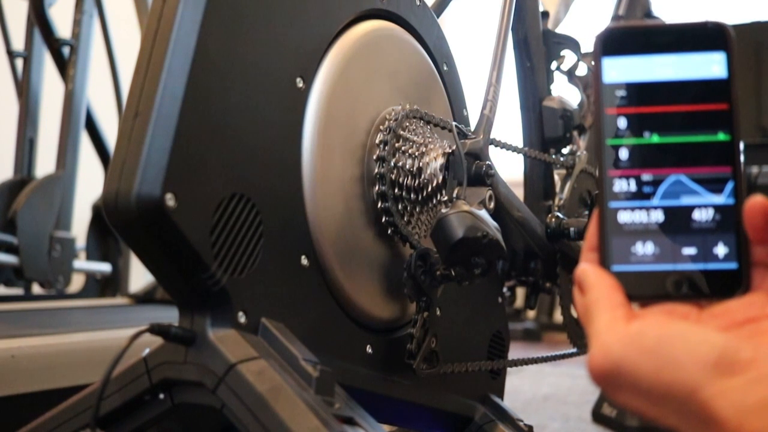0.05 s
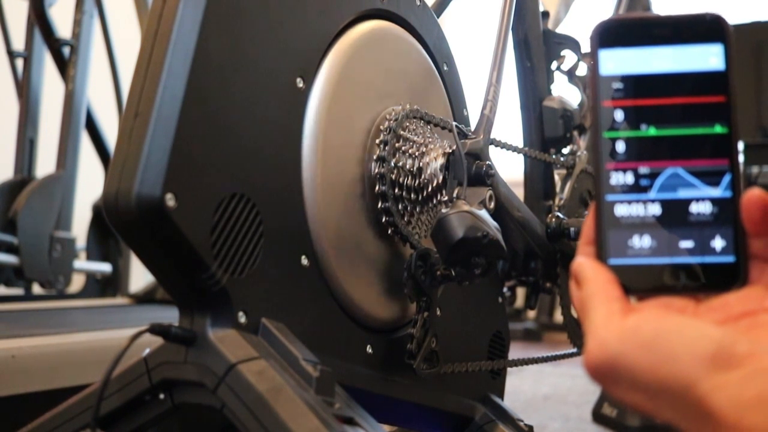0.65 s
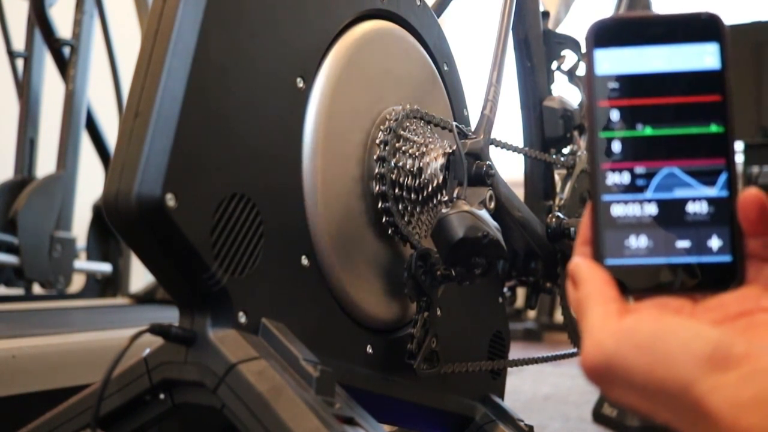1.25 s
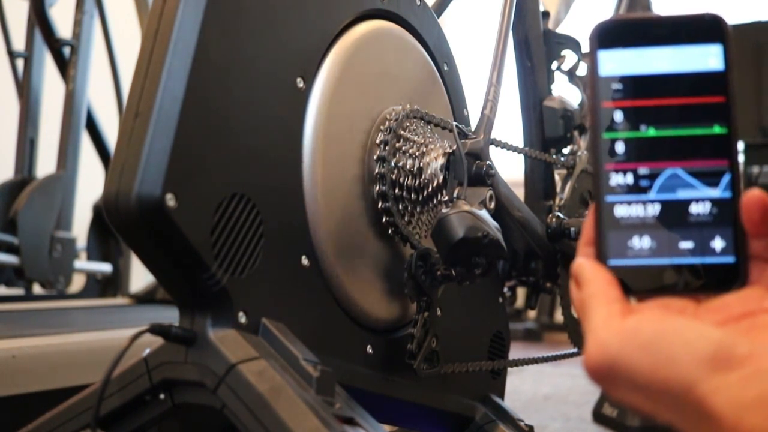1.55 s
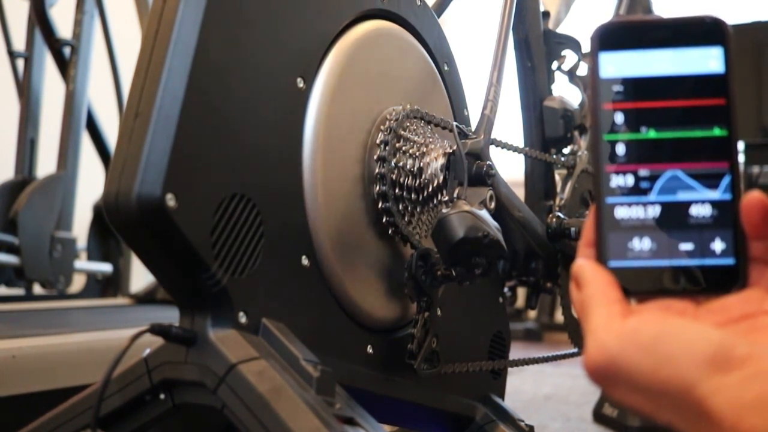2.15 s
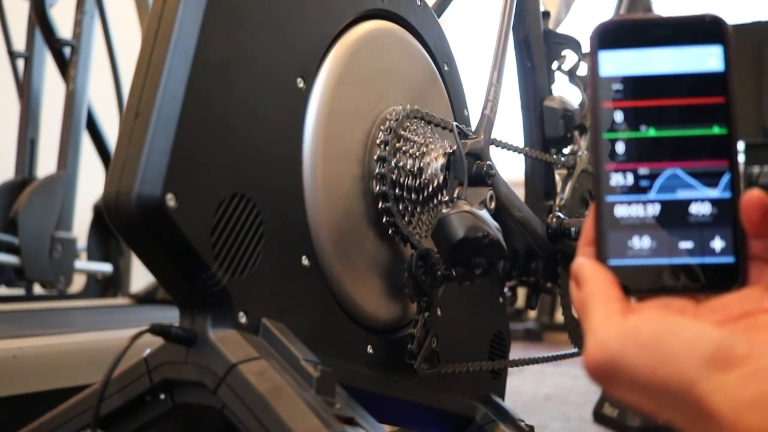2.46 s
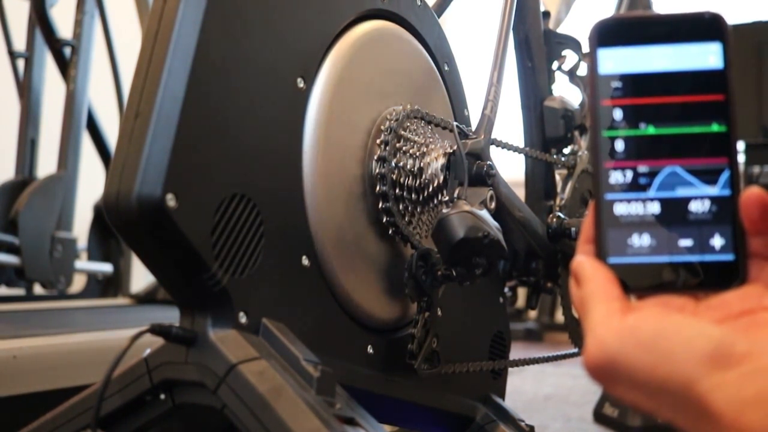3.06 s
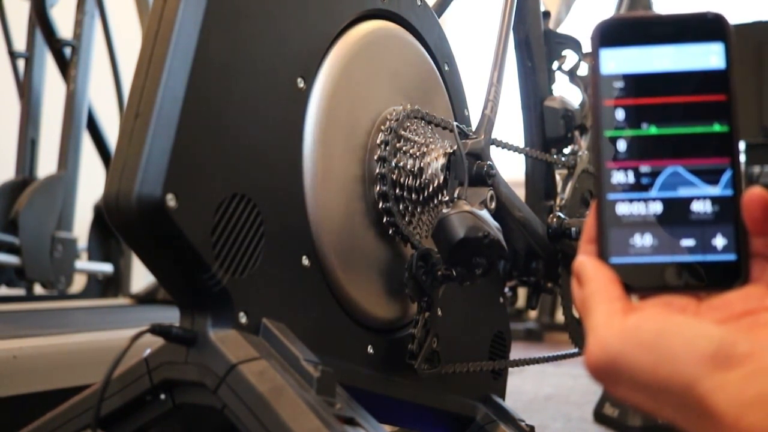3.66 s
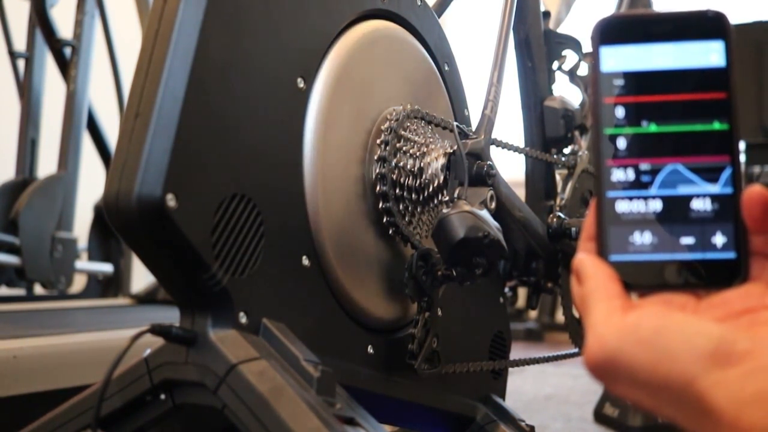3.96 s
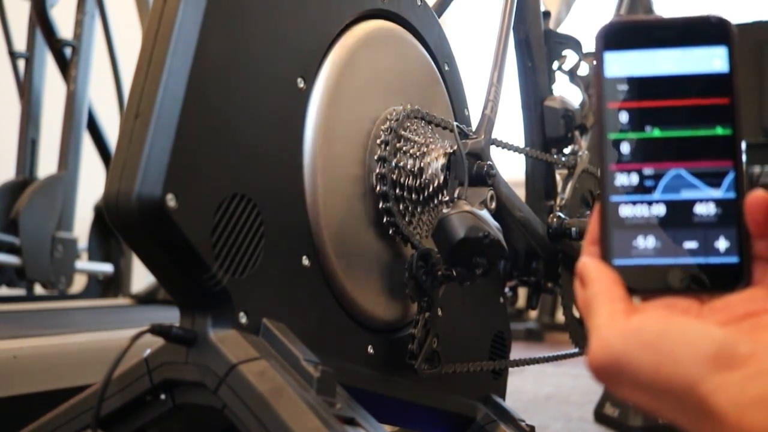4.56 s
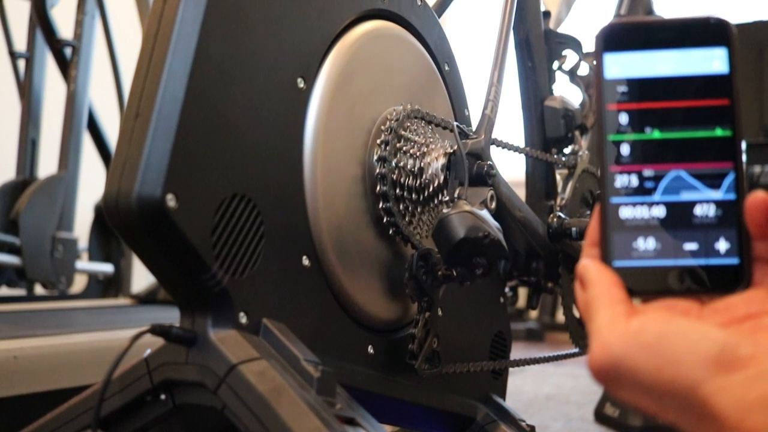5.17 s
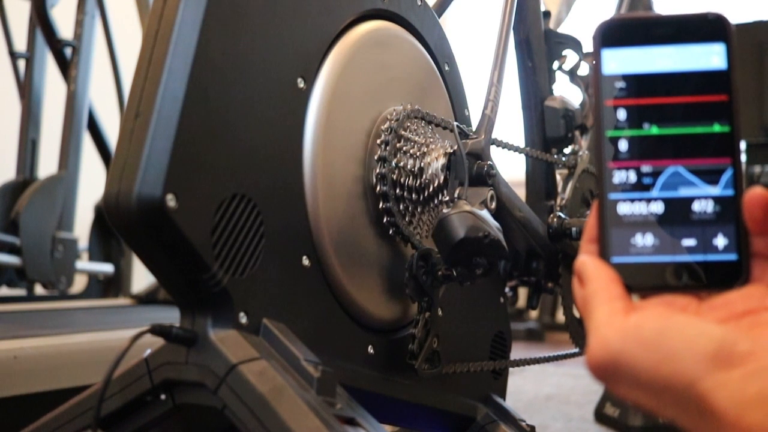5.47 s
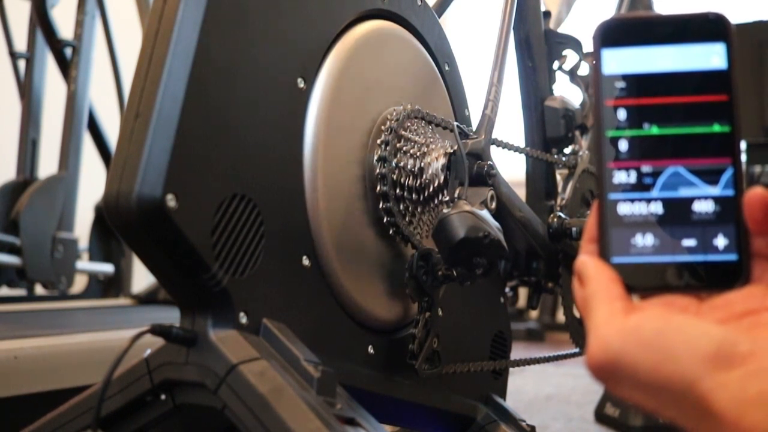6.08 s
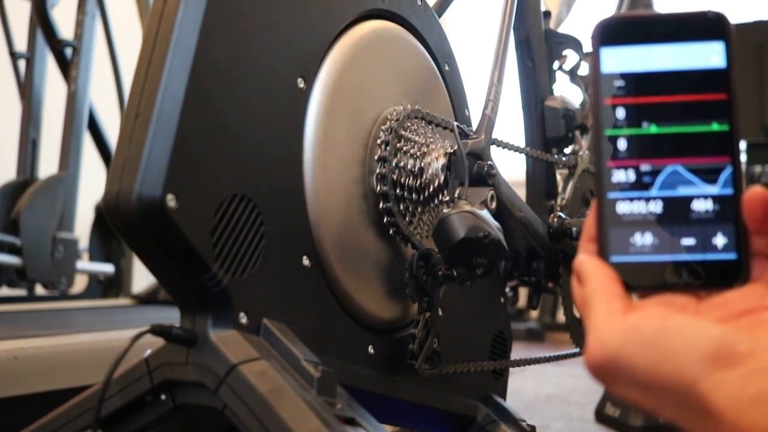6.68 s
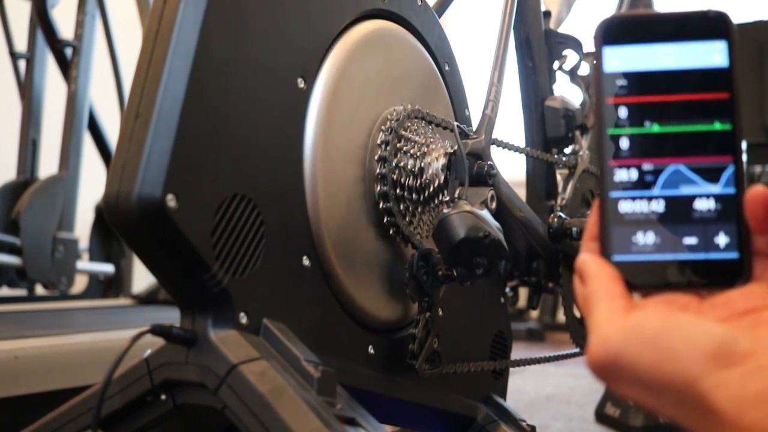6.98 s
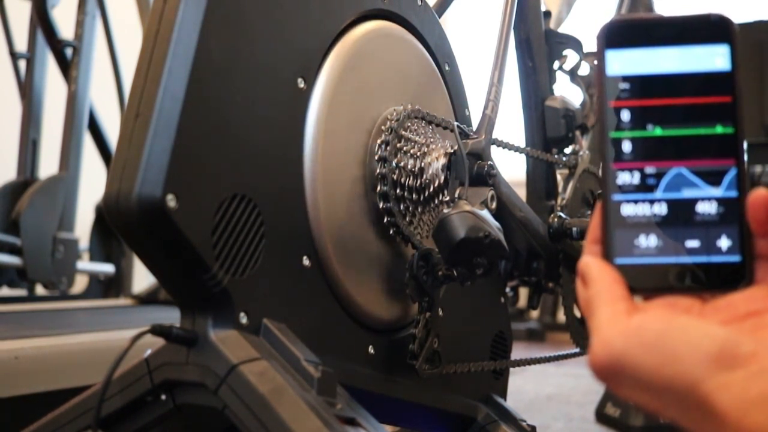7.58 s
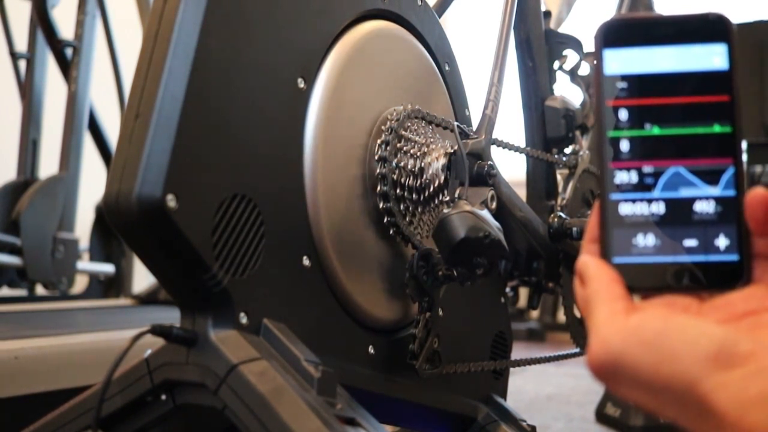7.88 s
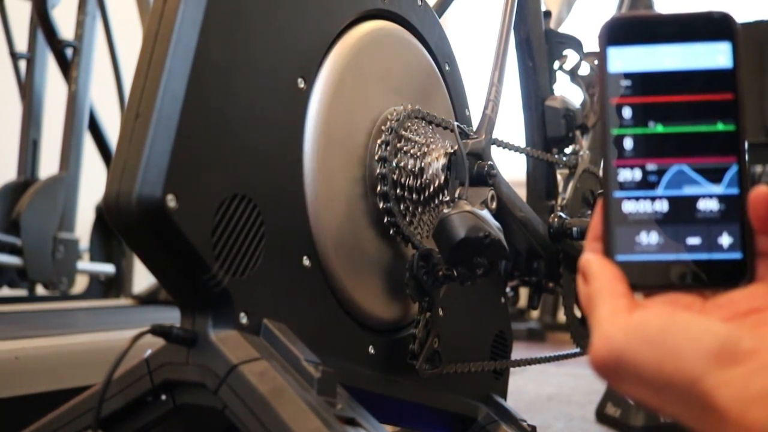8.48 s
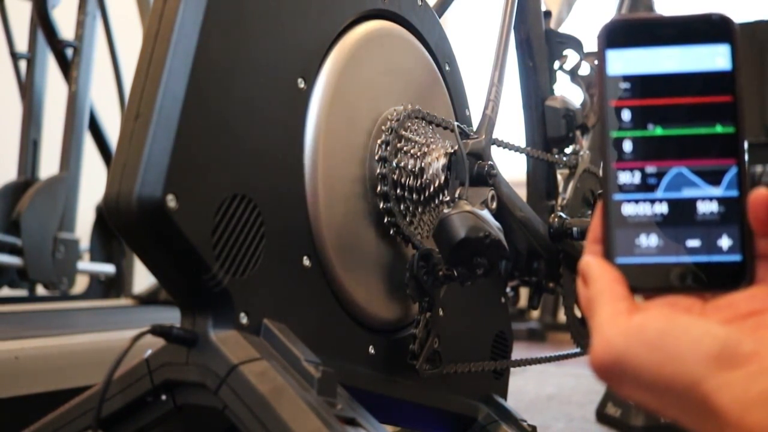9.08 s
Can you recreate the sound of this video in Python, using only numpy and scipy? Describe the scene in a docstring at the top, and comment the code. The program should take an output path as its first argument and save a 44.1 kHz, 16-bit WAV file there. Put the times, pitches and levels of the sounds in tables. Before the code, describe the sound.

Fast metallic ratcheting from a spinning bike trainer hub gradually quickens, with a faint motor whir underneath.

```python
"""An indoor bike trainer is already turning in a small room, its motor driving the flywheel through soft air.
From the first moment the freehub pawls snap over 24 ratchet teeth and set the standing cassette ringing;
the frame purrs along and a light rub slides down with every turn. As the hub slowly gains speed, motor
and belt whine on multiples of it, swelling and fading through the frame's resonances. At 2.6 s the
frame gives one soft knock. From about 8 s the speed holds."""
import sys
import numpy as np
from scipy import signal
from scipy.fft import rfft, irfft
from scipy.io import wavfile
from scipy.ndimage import uniform_filter1d

SR = 44100
rng = np.random.default_rng(int(sys.argv[2]) if len(sys.argv) > 2 else 0)


def file_out(sig):
    """Save sig as 16-bit WAV at sys.argv[1]."""
    # one column per channel
    cols = np.atleast_2d(sig).T
    # limit, then scale
    lim = np.clip(cols, -1, 1)
    pcm = np.round(lim * 32767).astype(np.int16)
    wavfile.write(sys.argv[1], SR, pcm)


N = 411453
TIME = np.arange(N) / SR
TOOTH_COUNT = 24
HOP = 256  # samples between the points of slow control curves


def gain_of(db):
    """Decibels to amplitude."""
    return 10 ** (np.asarray(db) / 20)


def unit_rms(x):
    """Scales a signal to an rms of one."""
    return x / np.sqrt(np.mean(x ** 2) + 1e-20)


def curve_at(points, hz):
    """Reads a curve of (Hz, value) points on a log-frequency axis."""
    point_hz, value = np.transpose(points)
    return np.interp(np.log(hz + 1), np.log(point_hz + 1), value)


def resonance_db(peaks, hz):
    """The boost or cut that (Hz, width Hz, dB) resonances and dead spots give at a frequency."""
    return sum(db / (1 + (2 * (hz - centre) / width) ** 2) for centre, width, db in peaks)


def drift(top_hz):
    """A smooth random wobble of unit size, from slow sines in the decade below top_hz."""
    t = TIME[::HOP]
    rates = np.geomspace(top_hz / 10, top_hz, 20)
    wobble = sum(np.sin(2 * np.pi * (hz * t + rng.random())) for hz in rates)
    return np.interp(TIME, t, unit_rms(wobble))


def stereo_noise(shape, likeness):
    """Two channels of white noise that are partly alike."""
    left, other = rng.standard_normal((2,) + shape)
    return np.array([left, likeness * left + np.sqrt(1 - likeness ** 2) * other])


def coloured(x, curve, peaks=(), size=4096, smooth_bins=37):
    """Gives x a broad tone curve with resonances on it, by a causal filter that keeps attacks sharp."""
    hz, power = signal.welch(x.mean(0), SR, nperseg=size)
    power = uniform_filter1d(uniform_filter1d(power, smooth_bins), smooth_bins // 2)
    db = curve_at(curve, hz) + resonance_db(peaks, hz)
    log_gain = np.log(gain_of(db)) - .5 * np.log(power + 1e-20)
    mirrored = np.r_[log_gain, log_gain[-2:0:-1]]
    minimum_phase = np.exp(np.conj(signal.hilbert(mirrored)))
    taps = np.fft.ifft(minimum_phase).real[:size // 2]
    return unit_rms(signal.oaconvolve(x, taps[None], axes=1)[:, :N])


def clicks(seconds, force):
    """Band-limited clicks, placed exactly even between samples."""
    at = seconds.reshape(-1, 1) * SR
    near = at.astype(int) + np.arange(-8, 9)
    shape = np.sinc(near - at) * np.cos(np.pi * (near - at) / 18) ** 2
    return np.bincount(np.maximum(near, 0).ravel(), (force.reshape(-1, 1) * shape).ravel(), N)[:N]


def hub_speed():
    """Turns a second: the hub gains speed ever more gently, then holds."""
    # In order: starting speed in turns/s, acceleration in turns/s^2, its easing in turns/s^3,
    # held speed in turns/s.
    spin_up = (3.124, .111855, .004137, 3.8831)
    start, acceleration, easing, held = spin_up
    return np.minimum(start + acceleration * TIME - easing * TIME ** 2 / 2, held)


def once_a_turn(turns, peak_turn):
    """Swings between -1 and 1 as the hub goes round, highest at the given share of a turn."""
    return np.cos(2 * np.pi * (turns - peak_turn))


def air(level_db=-41.5, swell_db=2.8):
    """A soft, fluttering rush of air round the flywheel over the rumble of the room."""
    # Tone of the air and rumble. Each row: frequency in Hz, relative level in dB.
    air_tone = [(20, -50), (35, -26), (50, -10), (64, 13.5), (82, -29), (130, 7), (230, 9.5), (350, 5),
                (440, 14.5), (510, 4.5), (620, 0), (800, -0.5), (1500, -18), (3000, 3), (8000, 9.5),
                (15500, 8)]
    # Stereo image of the bed. Each row: frequency in Hz, left-right likeness (1 is mono).
    air_image = [(100, 1), (400, 0.46), (800, 1), (1800, 0.25), (15000, 0.17)]
    hz = np.fft.rfftfreq(N, 1 / SR)
    likeness = curve_at(air_image, hz)
    left, other = rfft(rng.standard_normal((2, N)))
    right = likeness * left + np.sqrt(1 - likeness ** 2) * other
    rush = irfft(np.array([left, right]) * gain_of(curve_at(air_tone, hz)), N)
    return unit_rms(rush) * gain_of(level_db + swell_db * drift(top_hz=13))


def frame_knock():
    """One dull, quickly damped blow on the frame."""
    # The thud. In order: start in seconds, pitch in Hz, level in dB, time to fall 60 dB in seconds.
    thud = (2.588, 140, -41, .09)
    start, hz, db, t60 = thud
    age = np.maximum(TIME - start, 0)
    return gain_of(db - 60 * age / t60) * np.sin(2 * np.pi * hz * age)


def hub_rub(turns, level_db=-40.0, fade_db=-7.5, start_turn=.1, from_hz=4500, to_hz=1980, width_hz=650):
    """A light rub in the hub; with every turn its broad resonance swells, slides down and fades."""
    progress = (turns - start_turn) % 1
    centre_hz = from_hz * (to_hz / from_hz) ** progress
    carrier = np.exp(2j * np.pi * np.cumsum(centre_hz) / SR)
    grit = stereo_noise((N,), likeness=.36) + 1j * stereo_noise((N,), likeness=.21)
    hiss = (signal.lfilter(*signal.butter(2, width_hz / 2, fs=SR), grit) * carrier).real
    envelope = np.sin(np.pi * progress) * gain_of(level_db + fade_db * progress)
    return unit_rms(hiss) * envelope * gain_of([[-.7], [.7]])


def motor_whine(turns, wander_db=.4, flutter=.091, width=.15):
    """Clean tones of motor and belt, locked to the hub; each swells as it crosses a frame resonance."""
    # Faint whines. Each row: multiple of the hub speed, level in dB before the resonances.
    faint_whines = [(31, -72.6), (32, -65.3), (60, -65), (61, -70), (64, -64), (80, -76), (90, -66),
                    (121, -61.5), (128, -72), (164, -80), (210, -78)]
    # Resonances and dead spots of frame and room. Each row: centre in Hz, width in Hz, gain in dB.
    frame_peaks = [(99.6, 7.3, 11), (110.6, 15, -6.6), (124.3, 8, 19.9), (215, 6, 4), (225.7, 6.2, 3.4),
                   (238.1, 4.2, 8.3), (244.7, 3.3, 9.5), (381, 6, 5), (388, 4, -12), (402.4, 12.7, 10.5),
                   (412, 4, -9), (418, 5, 5), (437, 19.5, 13.9), (449, 5, -14), (457.4, 9.9, 7.8),
                   (469.3, 2.5, 4), (609, 16, 22), (780, 45, 12.4)]
    # Strong whines, each with its own swells, keyed by multiple of the hub speed.
    # Each row: pitch in Hz, level in dB at that pitch.
    strong_whines = { 91: [(285, -50), (292, -49.5), (303, -53.5), (309, -52.5), (314, -58.5), (328, -50),
                     (335, -53), (341, -59), (353, -47.5)], 96: [(300, -57), (309, -54), (319, -58),
                     (325, -75), (335, -56), (346, -58), (354, -49), (359.5, -63), (362, -48), (366, -43),
                     (370, -49), (372.8, -42)], 160: [(520, -76), (535, -64), (545, -61.5), (568, -67),
                     (577, -72), (586, -56), (598, -53.5), (605, -63), (612, -58.5), (621, -71)], }
    speed, out = hub_speed()[::HOP], np.zeros((2, N))
    whines = [(k, db + resonance_db(frame_peaks, k * speed)) for k, db in faint_whines]
    whines += [(k, curve_at(swells, k * speed)) for k, swells in strong_whines.items()]
    for multiple, level_db in whines:
        db = np.interp(TIME, TIME[::HOP], level_db) + wander_db * drift(top_hz=.91)
        stereo_phase = width * multiple / 100 * np.array([[1], [-1]])
        phase = 2 * np.pi * (multiple * turns + rng.random()) + stereo_phase
        out += np.sqrt(2) * gain_of(db) * (1 + flutter * drift(top_hz=15)) * np.sin(phase)
    return out * gain_of([[-.6], [.6]])


def frame_purr(turns, trim_db=.43, wander_db=1.84, side_db=-7, shake_teeth=.0074):
    """The frame hums on overtones of the tooth rate that shake each turn and swell in the casing."""
    # Broad tone of the purr. Each row: frequency in Hz, base level in dB.
    purr_tone = [(380, -65.6), (550, -79.5), (750, -70.5), (860, -78), (1000, -69), (1200, -60.5),
                 (1550, -65), (1750, -63.5), (2000, -61.5), (2500, -62)]
    # Resonances and dead spots of the casing. Each row: centre in Hz, width in Hz, gain in dB.
    casing_peaks = [(436, 30, 13), (533.4, 15.1, 8.5), (605, 14, 11), (670, 60, -7), (738, 20, 5),
                    (850, 60, -6), (924, 26, 5), (965, 12, -10), (984, 14, 6), (1012, 20, 4),
                    (1120.2, 22.0, 2.9), (1183.3, 13.0, 8.4), (1212.9, 11.4, 4.7), (1242.8, 11.6, 5.0),
                    (1391.7, 32.1, 6.3), (1716.8, 56.4, 6.3), (1800.2, 14.6, 7.0), (1851.6, 8.4, -8.1),
                    (1863.6, 5.0, 3.6), (1897.2, 12.8, 3.7), (1964.4, 21.2, -9.4), (2048.4, 10.0, 4.9),
                    (2158.7, 52.4, 7), (2255.0, 14.8, 4.8), (2304.5, 14.9, 4.5), (2348.0, 12.7, 7.9)]
    # Two overtones that stand out with their own swells, keyed by multiple of the tooth rate.
    # Each row: pitch in Hz, base level in dB at that pitch.
    loud_overtones = { 14: [(1075, -69), (1110, -59), (1135, -60), (1143, -72), (1160, -59), (1181, -52.5),
                      (1198, -59), (1213, -54.5), (1228, -62), (1246, -54.5), (1304, -65)],
                      20: [(1500, -66), (1520, -61), (1595, -63), (1650, -55.5), (1672, -60), (1715, -53),
                      (1755, -61), (1795, -61), (1840, -70), (1864, -60.5)], }
    teeth_passed = turns * TOOTH_COUNT + shake_teeth * (np.sin(2 * np.pi * turns) + drift(top_hz=12))
    tooth_hz, out = hub_speed()[::HOP] * TOOTH_COUNT, np.zeros((2, N))
    for k in range(5, 28):
        hz = k * tooth_hz
        if k in loud_overtones:
            base_db = curve_at(loud_overtones[k], hz)
        else:
            base_db = curve_at(purr_tone, hz) + resonance_db(casing_peaks, hz)
        db = np.interp(TIME, TIME[::HOP], base_db) + trim_db + wander_db * drift(top_hz=3)
        # Higher overtones throb more deeply and spread wider.
        throb = 1 + k / 40 * once_a_turn(turns, rng.random())
        phase = 2 * np.pi * (k * teeth_passed + rng.random())
        side = gain_of(side_db) * k / 16 * np.sin(phase + 2 * drift(top_hz=3))
        out += gain_of(db) * throb * (np.sin(phase) + side * np.array([[1], [-1]]))
    return np.sqrt(2) * out


def pawl_blows(turns, spacing_error=.0056, uneven_db=.74, bounce_db=-16, bounce_s=.0007, bounce_count=3):
    """At each slightly uneven tooth one pawl drops; the others follow and bounce within about 2 ms."""
    late = spacing_error * rng.standard_normal(TOOTH_COUNT)
    passed = np.arange(int(turns[-1] * TOOTH_COUNT))
    drop_position = passed + .606 + late[passed % TOOTH_COUNT]  # in teeth: partway through each one
    drops = np.interp(drop_position, turns * TOOTH_COUNT, TIME)[:, None]
    force = gain_of(uneven_db * rng.standard_normal(drops.shape))
    bounces = drops + np.cumsum(bounce_s * rng.uniform(.2, 1, (len(drops), bounce_count)), 1)
    bounce_force = force * gain_of(bounce_db) * rng.choice([-1, 1], bounces.shape)
    return clicks(drops, force) + clicks(bounces, bounce_force)


def reflections(blows, path, t60, likeness, direct=0, path_count=TOOTH_COUNT):
    """As the hub turns, blows take different paths: dense dying echoes after an optional direct hit."""
    t = np.arange(int(SR * t60)) / SR
    tails = stereo_noise((path_count, SR // 2), likeness)[..., :len(t)] * gain_of(-60 * t / t60)
    tails /= np.linalg.norm(tails, axis=2, keepdims=True)
    tails[..., 0] += direct
    return sum(signal.oaconvolve((blows * (path % path_count == k))[None], tails[:, k], axes=1)[:, :N]
               for k in range(path_count))


def cassette_ring(blows, turns):
    """The sprockets ring with each blow; modes swell once a turn and some arch in pitch twice a turn."""
    # Sprocket modes. Each row: pitch in Hz, relative level in dB, time to fall 60 dB in seconds,
    # pitch waver in Hz, swell in dB, share of the turn where the swell peaks.
    modes = [ (2150, -17, .08, 10, 2, .56), (2700, -19, .12, 0, 5, .69), (2780, -19, .12, 0, 5, .71),
             (3190, -14, .1, 0, 2, .59), (3355, -14, .11, 0, 3, .47), (3510, -12, .07, 20, 4, .5),
             (3620, -15, .1, 0, 3, .39), (3930, -12, .1, 0, 2, .25), (4005, -12, .09, 0, 2, .9),
             (4092, -8, .1, 0, 1, .24), (4993, 1, .11, 40, 2, .92), (5030, -5, .07, 40, 3, .92),
             (6965, -9, .14, 0, 4, .08), (8520, -3, .08, 0, 1, .16), (9455, -10.5, .11, 0, 0, 0),
             (11780, -7, .05, 0, 1, .29), (12440, -13, .06, 0, 2, .32)]
    t, out = np.arange(SR // 5) / SR, np.zeros((2, N))
    sway = 2 * np.pi * np.cumsum(once_a_turn(2 * turns, peak_turn=.83)) / SR
    blows = np.diff(blows, prepend=0)  # thin sprockets send out no bass
    for hz, db, t60, waver_hz, swell_db, peak_turn in modes:
        mode = gain_of(-60 * t / t60) * np.exp(2j * np.pi * hz * t)
        bend = np.exp(1j * waver_hz * sway)
        drive = blows * gain_of(swell_db * once_a_turn(turns, peak_turn))
        ring = signal.oaconvolve(drive / bend, mode)[:N] * bend
        out += gain_of(db) * unit_rms((ring * np.exp([[1j], [0]])).imag)  # left leads by a radian
    return out


def body_clack(blows, low_hz, high_hz, db, chance_db=1.5):
    """The stiff freehub body answers a blow with a few quickly damped cycles, never equally strong."""
    drive = blows * gain_of(chance_db * drift(top_hz=40))
    band = signal.butter(2, [low_hz, high_hz], "bandpass", fs=SR)
    return gain_of(db) * unit_rms(signal.lfilter(*band, drive))


def rattle(blows, t60, likeness):
    """A burst of fine rattle after each blow, never twice the same."""
    decay = gain_of(-120 / (t60 * SR))
    energy = signal.lfilter([1 - decay], [1, -decay], blows ** 2)
    return np.sqrt(energy) * stereo_noise((N,), likeness)


def shell_snap(blows, turns, low_gain, top_gain, rattle_db=6.0, split_hz=10600):
    """The hub shell's bright crack: part the tooth's own, part chance; the tooth also sets its top end."""
    # Broad tone of the snap. Each row: frequency in Hz, relative level in dB.
    snap_tone = [(400, -90), (900, -32), (1250, -34.5), (1600, -31.5), (2300, -14), (2900, -26),
                 (3500, 1.5), (4500, -12), (5700, -1.5), (6600, 0), (7400, -1), (8600, 4), (11000, 1),
                 (12500, 4.5), (14300, -1.5), (15700, -7.5)]
    # Short resonances and dead spots of the shell. Each row: centre in Hz, width in Hz, gain in dB.
    shell_peaks = [(5750, 400, 3), (7000, 250, 3), (7300, 250, -2), (8050, 200, 2), (8700, 400, 1.5),
                   (10750, 300, 3), (11280, 200, -4), (11830, 400, 4), (12130, 150, -3), (13100, 350, 3),
                   (13450, 250, -5), (13950, 400, 3.5), (15450, 300, 2)]
    tooth = (turns * TOOTH_COUNT).astype(int)
    shell = reflections(blows, tooth, t60=.012, likeness=.42, direct=.75)
    shell += gain_of(rattle_db) * rattle(blows, t60=.013, likeness=.42)
    crack = coloured(shell, snap_tone, shell_peaks)
    low = signal.sosfiltfilt(signal.butter(4, split_hz, fs=SR, output="sos"), crack)
    top = (crack - low) * gain_of([[.4], [-.4]])
    return unit_rms(low * low_gain + top * top_gain)


def freehub(turns, level_db=-26.0, room_db=-3.5, cassette_db=-12.0):
    """Each pawl blow snaps the shell, clacks the body, rings the cassette and draws the room's answer."""
    # The ratchet teeth in order, each worn differently. Each row, all as trims in dB: low clack,
    # high clack, lower part of the snap, top of the snap, cassette ring.
    tooth_wear = [(-6, -6, -2, -1, -.7), (0, -2, -2, -3, -2.7), (2, -1, 0, 0, 1), (-2.5, -3.5, 0, 0, -2.9),
                  (6, -2, 1.5, -1, -.2), (5.5, -1, 1, 2, 1.5), (-7.5, -5, 2, 2, -2.6), (-1, -1, 1, 2, -3.1),
                  (3, 3.5, 1, 1, -.4), (2, 0, -1, 1, .1), (-6, -3.5, -1, 3, -1.3), (-2.5, -2, 0, -1, -1.9),
                  (4, 2.5, -1, -1, 2.5), (4, 5.5, -1, 1, 3), (-4, 3.5, 0, 0, -1.5), (0, 0, -1, 0, -2),
                  (0, 0, -1, -1, -1.5), (-2.5, 2, -1, 0, 1.1), (3, 0, 1, -2, 2), (2, 4.5, -1, -2, 1.9),
                  (-6, 1, 1, -1, .5), (-2.5, 0, 1, 1, 3.5), (-1, 1, 1, 0, .5), (-2.5, 2, 0, 0, 0)]
    # The body's low and high clack. Each row: lower edge in Hz, upper edge in Hz, dB beside the snap.
    clack_bands = [(4370, 5036, -9), (5410, 5930, -11)]
    # Tone of the room's after-ring. Each row: frequency in Hz, relative level in dB.
    room_tone = [(450, -26.5), (700, -16.5), (950, -25), (1200, -7.5), (1550, -10.5), (2200, -3),
                 (2700, -4.5), (3000, -5), (3500, -4), (3900, -1), (4500, 1.5), (6100, -5), (8500, 0),
                 (11000, -4.5), (12200, -3), (15500, -4.5)]
    # How hard the pawls strike. Each row: time in seconds, level trim in dB.
    strike_force = [(0, 0.6), (.5, 0.1), (.95, 1.2), (1.4, .3), (1.75, -0.4), (2.3, .5), (2.7, 0),
                    (4, -0.3), (4.65, 1), (5.3, 0), (6.3, 0.4), (7.3, 0), (9.3, 0.4)]
    blows = pawl_blows(turns)
    tooth = np.floor(turns * TOOTH_COUNT - .5).astype(int) % TOOTH_COUNT  # steps just before each drop
    on_low, on_high, on_shell, on_top, on_cassette = gain_of(np.transpose(tooth_wear))[:, tooth]
    echoes = reflections(blows, tooth // 4, t60=.25, likeness=.3, path_count=6)
    room = gain_of(room_db) * coloured(echoes, room_tone)
    cassette = gain_of(cassette_db) * cassette_ring(blows * on_cassette, turns)
    body = body_clack(blows * on_low, *clack_bands[0]) + body_clack(blows * on_high, *clack_bands[1])
    snap = shell_snap(blows, turns, on_shell, on_top)
    ticks = snap + body * gain_of([[-.6], [.6]]) + cassette + room
    force_db = np.interp(TIME, *np.transpose(strike_force))
    return gain_of(level_db + force_db) * ticks / ticks.mean(0).std()


def scene():
    """The turning hub drives ticks, purr, rub and whine over a bed of air, with one knock."""
    turns = np.cumsum(hub_speed()) / SR
    trainer = freehub(turns) + frame_purr(turns) + hub_rub(turns) + motor_whine(turns)
    return trainer + air() + frame_knock()


def record(dry, edge_hz=15950):
    """A steep low-pass takes off the highest treble."""
    lowpass = signal.firwin(511, edge_hz, window=("kaiser", 9), fs=SR)
    return signal.oaconvolve(dry, lowpass[None], "same")


dry = scene()
out = record(dry)
file_out(out)
```